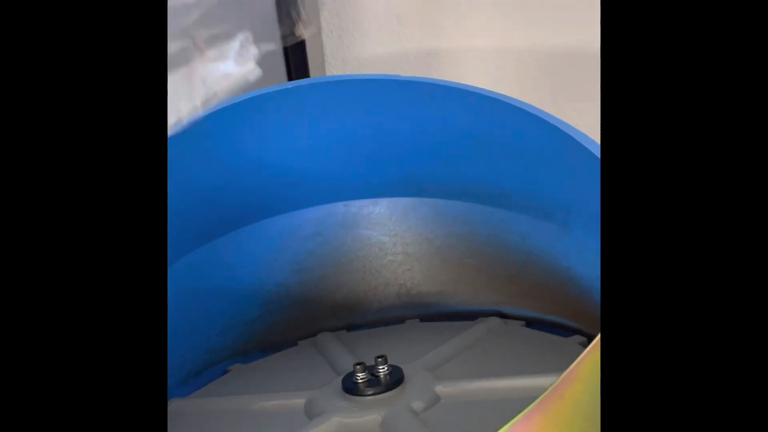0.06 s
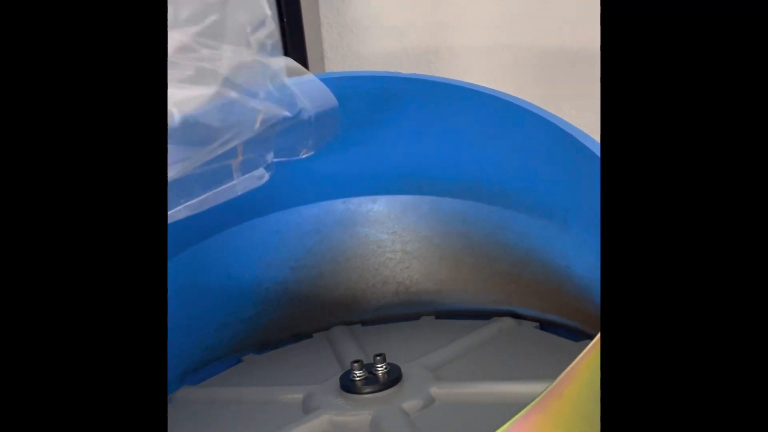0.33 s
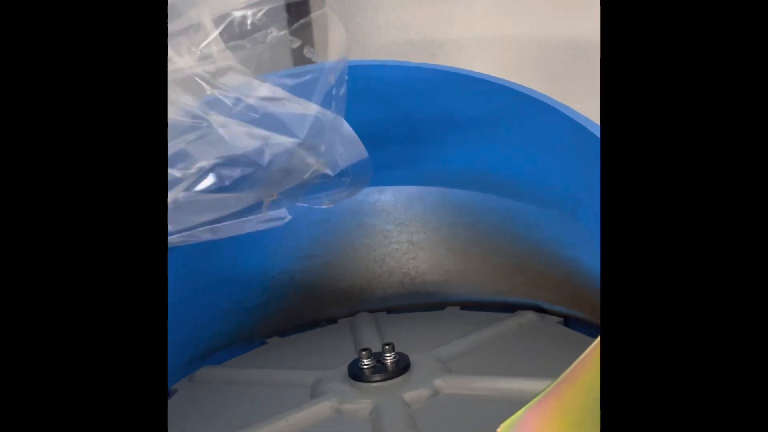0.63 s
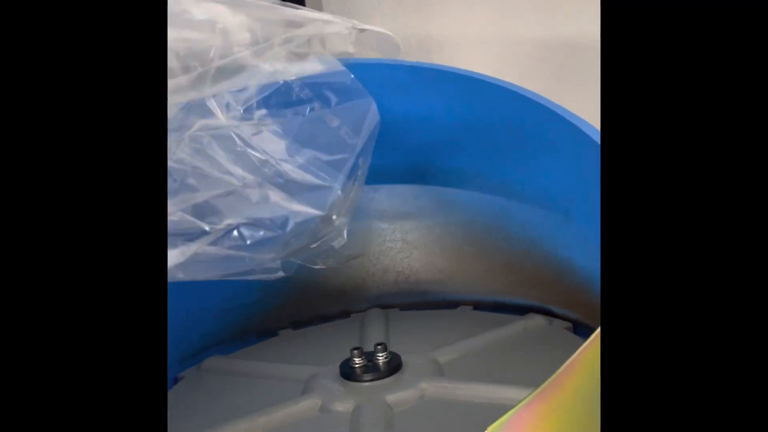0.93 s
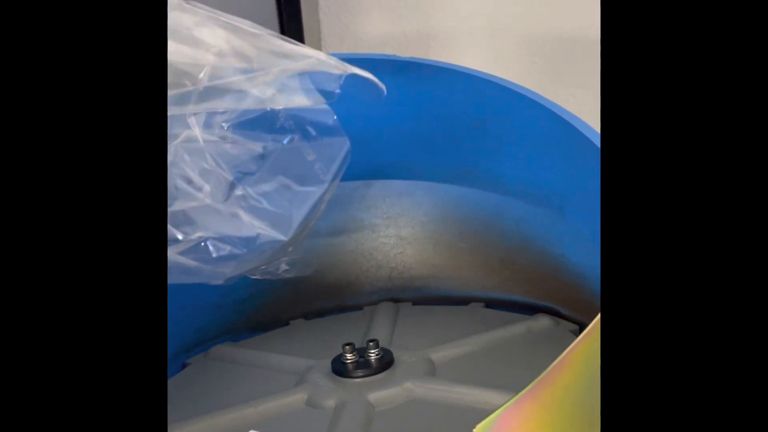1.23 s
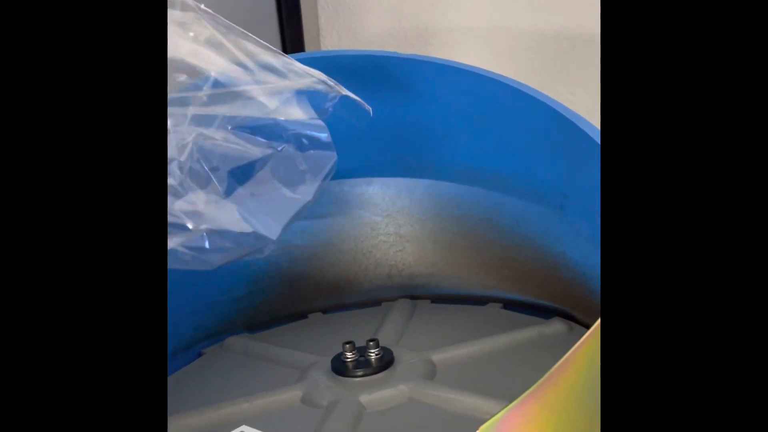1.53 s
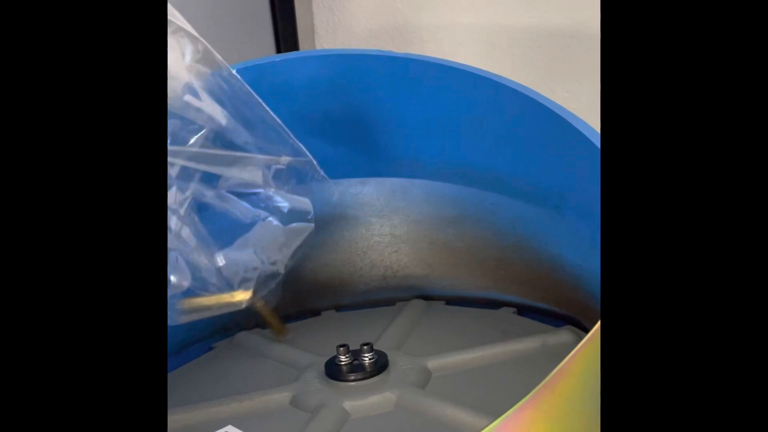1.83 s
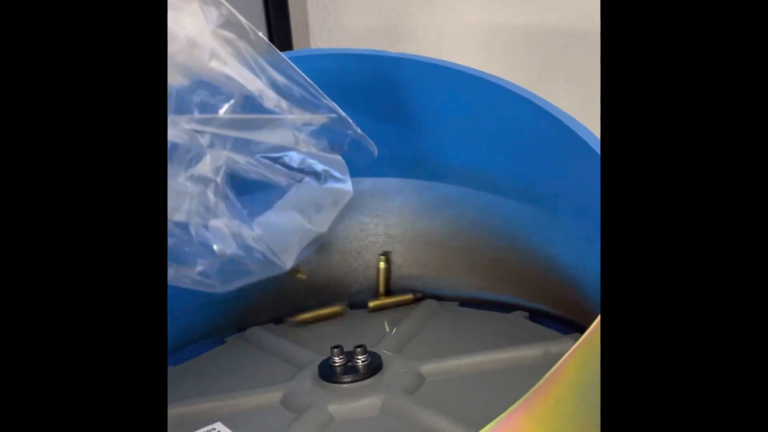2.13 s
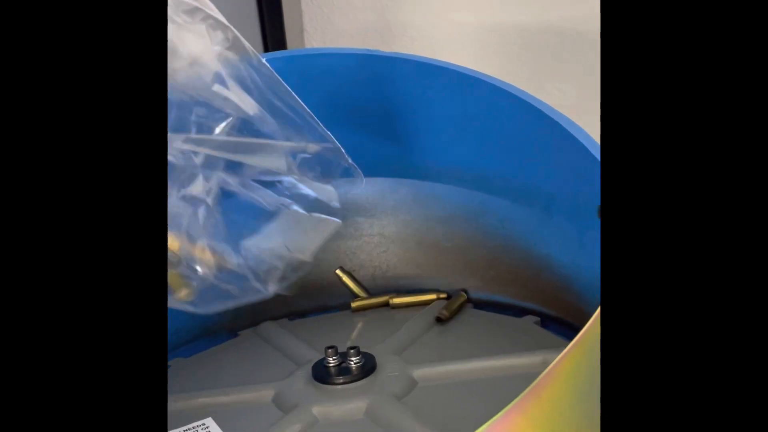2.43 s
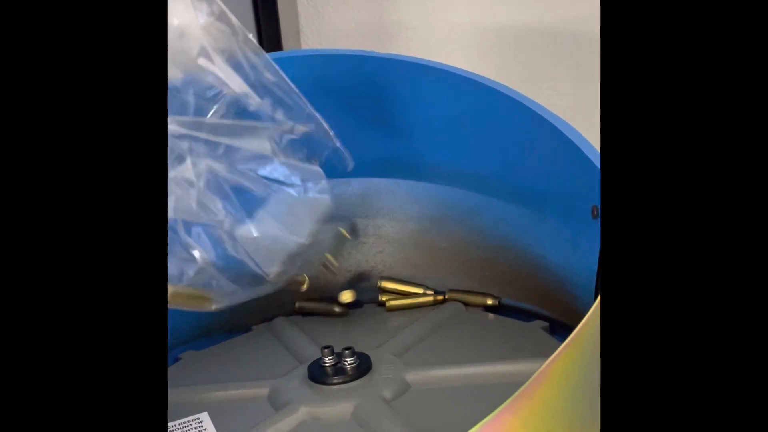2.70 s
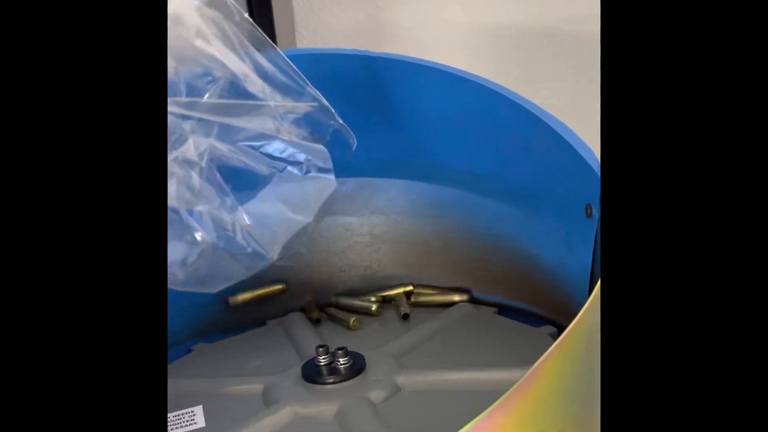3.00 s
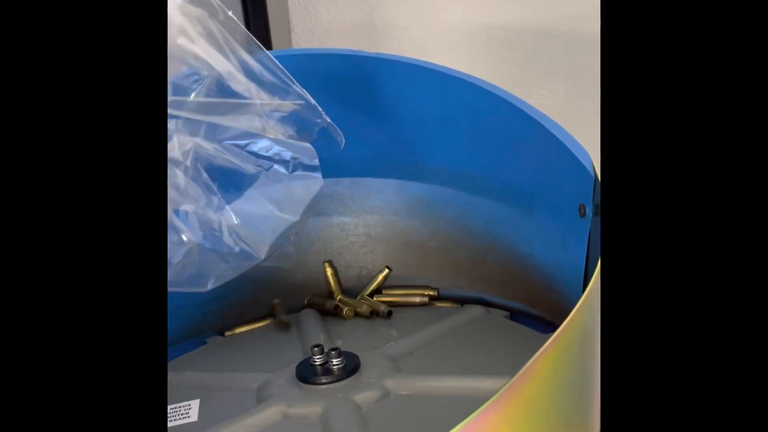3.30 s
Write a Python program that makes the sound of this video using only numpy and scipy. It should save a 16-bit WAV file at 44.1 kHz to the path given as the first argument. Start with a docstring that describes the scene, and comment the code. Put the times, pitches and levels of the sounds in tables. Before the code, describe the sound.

Brass cartridge cases clatter into a hard bowl, poured from a crinkling plastic bag.

```python
"""A plastic bag of brass cartridge cases is tipped over a hard plastic bowl in a small room.
First the bag crinkles, snaps and pops over a low electrical hum, and the cases jingle inside.
At about 1.7 s they slide to the bag's mouth. From 1.8 s the hum is quieter and the cases drop,
bounce and roll: the bowl clacks and thumps, and brass rings very high where case meets case.
The last small hits die away at about 3.5 s."""
import sys
import numpy as np
from scipy import signal
from scipy.fft import rfft, irfft, next_fast_len
from scipy.io import wavfile

SR = 44100
rng = np.random.default_rng(int(sys.argv[2]) if len(sys.argv) > 2 else 0)


def store_pcm(level_fs):
    """Save levels as 16-bit WAV."""
    pcm = np.round(np.clip(level_fs, -1, 1) * 32767).astype(np.int16)
    wavfile.write(sys.argv[1], SR, np.atleast_2d(pcm).T)


N = 156555
TIME = np.arange(N) / SR
# A "fade" is the time a sound takes to fall by 60 dB. A "tone" table boosts or cuts each pitch.
TICK_FADE_S, TICK_BAND_HZ = 0.0036, (5000, 16000)  # the sharp edge of a hit or a snap


def bowl_hits(chatter_db=-1.5, tick_db=5):
    """Each landing case ticks, chatters against the bowl and sets it ringing."""
    # cases striking the bowl: start_s, low_db, middle_db, high_db
    hits = [(1.7973, -44, -20, -22), (1.814, -13, -6.5, -17), (1.817, -39, -13, -36), (1.84, -22, -17, -48),
            (1.8495, -20, -14, -5.5), (1.858, -22, -14.5, -26), (1.906, -40, -20, -24),
            (1.9152, -21, -9, -8), (1.921, -23, -29, -16), (1.931, -18, -12, -14),
            (2.0502, -24, -14.5, -12.5), (2.0972, -16.5, -13.5, -21), (2.109, -23, -13, -7),
            (2.1499, -19.5, -19, -28), (2.158, -17.5, -19, -37), (2.163, -32, -18, -18.5),
            (2.1925, -27.5, -24, -21.5), (2.2134, -29, -19, -28), (2.285, -27, -19, -27.5),
            (2.312, -27, -17.5, -14), (2.351, -23.5, -22, -26), (2.4643, -26.5, -27.5, -30),
            (2.5299, -27, -13, -18), (2.564, -16, -6, -8.5), (2.5956, -19, -38, -9),
            (2.604, -21.5, -26, -11), (2.608, -20.5, -12, -21), (2.6753, -44, -19.5, -21),
            (2.6948, -11, -15.5, -14.5), (2.7212, -25, -14.5, -8), (2.7664, -31, -23, -16),
            (2.8294, -22, -14, -12.5), (2.8844, -29, -29, -22), (2.899, -27, -23, -18.5),
            (2.916, -34, -22.5, -21.5), (3.042, -34, -32, -29), (3.165, -22, -15.5, -14),
            (3.1935, -17, -15, -17), (3.203, -29, -32, -44), (3.2745, -30, -21.5, -24),
            (3.384, -41.5, -32.5, -46), (3.4268, -49, -45, -55), (3.437, -43, -39, -55)]
    # the low, middle and high bands of a hit: from_hz, to_hz
    bands = [(1050, 1785), (2200, 4460), (4500, 9300)]
    # tone of a hit: pitch_hz, level_db
    tone = [(150, 13), (700, 1.5), (950, -1), (1250, 2), (2500, 6), (3500, -1.5), (5000, 2), (7000, 3),
            (9500, -1), (11500, -2), (16000, -5.5)]
    out = np.zeros(N)
    for start_s, *band_dbs in hits:
        chatter = sum(from_db(db + chatter_db) * burst(fade_s=0.03, band_hz=band, hold_s=0.0009)
                      for db, band in zip(band_dbs, bands))
        add(out, start_s, chatter)
        add(out, start_s, from_db(band_dbs[-1] + tick_db) * burst(TICK_FADE_S, TICK_BAND_HZ))
        add(out, start_s, through(chatter, bowl_ring()))
    return colour(out, tone)


def bowl_ring(fade_s=0.04, gain_db=-2, pitch_spread=0.012, spread_db=4):
    """The bowl's own notes; each spot that is struck changes their pitch and strength a little."""
    # notes of the bowl: pitch_hz, level_db
    notes = [(1323, -7), (1572, -7), (1909, -9), (2040, -9), (2342, -11), (2514, -8), (2951, -7),
             (4221, -10), (4336, -8), (5073, -9), (5680, -10), (6900, -12)]
    hz, db = np.transpose(notes)
    detune, uneven = rng.standard_normal((2, len(hz)))
    ring = ringing(hz * (1 + pitch_spread * detune), db + gain_db + spread_db * uneven, fade_s)
    return 2 * ring / fade(fade_s).sum()


def rolling():
    """Cases roll and jostle, and the bowl rings along."""
    # loudness of the rolling: time_s, level_db
    loudness = [(1.8, -66), (1.88, -26.5), (2.0, -40), (2.16, -24), (2.26, -47.5), (2.34, -32), (2.5, -42),
                (2.62, -31), (2.78, -29), (2.9, -33), (3.05, -35.5), (3.15, -41), (3.22, -34.5),
                (3.36, -47.5), (3.47, -53.5), (3.55, -59)]
    # tone of the rolling: pitch_hz, level_db
    tone = [(200, -14), (600, -12), (1200, 2.5), (2000, 6), (3000, 6.5), (4500, 0.5), (7000, 1.5),
            (10000, -21), (16000, -29)]
    contacts = crackle(loudness, tone, per_s=600, spread_db=5)
    return contacts + through(contacts, bowl_ring())


def bowl_thumps(echo_fade_s=0.06, echo_db=-1, low_cut_hz=50):
    """The bowl's wall flexes. High waves arrive first, so the pitch falls; rim echoes roughen it."""
    # flexes of the wall: start_s, level_db, start_pitch_hz, time_to_half_pitch_s, fade_s
    thumps = [(1.816, -19, 590, 0.0022, 0.08), (2.833, -26, 480, 0.016, 0.1),
              (2.906, -22.5, 600, 0.0022, 0.095), (3.168, -37, 715, 0.002, 0.12)]
    out, echo_fade = np.zeros(N), fade(echo_fade_s)
    for start_s, db, start_hz, halving_s, fade_s in thumps:
        decay = fade(fade_s)
        hz = start_hz / (1 + TIME[:len(decay)] / halving_s)
        wave = from_db(db) * decay * np.sin(2 * np.pi * np.cumsum(hz) / SR)
        echoes = rng.standard_normal(len(echo_fade)) * echo_fade / np.linalg.norm(echo_fade)
        add(out, start_s, wave)
        add(out, start_s, from_db(echo_db) * through(wave, echoes))
    return signal.sosfilt(signal.butter(2, low_cut_hz, "high", fs=SR, output="sos"), out)


def brass_tings(other_notes_db=-4):
    """Case meets case: one clear, high note sounds over the case's other notes."""
    # cases touching: start_s, level_db, pitch_hz
    tings = [(0.375, -32, 13330), (0.468, -30, 11480), (1.855, -30, 13280), (2.045, -32, 13200),
             (2.095, -31, 13150), (2.42, -38, 13500), (2.582, -23, 15350), (2.72, -29, 13400),
             (2.902, -27, 15700), (3.165, -26, 13280), (3.27, -27, 15630), (3.311, -28, 15630)]
    out = np.zeros(N)
    for start_s, db, hz in tings:
        add(out, start_s, ringing(hz, db, fade_s=0.28, size=8000))
        add(out, start_s, from_db(db + other_notes_db) * case_ring())
    return out


def brass_jingle(per_s=130, spread_db=5):
    """A dozen cases take turns ringing in quick, light touches."""
    # loudness of the jingle: time_s, level_db
    loudness = [(0.05, -81), (.31, -54), (.38, -37), (.49, -27), (.6, -54), (.8, -76), (.9, -58),
                (1.03, -47), (1.12, -88), (1.52, -53), (1.63, -42), (1.8, -40), (1.95, -56), (2.26, -63),
                (2.45, -39), (2.7, -29.5), (2.95, -38), (3.14, -45), (3.33, -55), (3.55, -50)]
    out = np.zeros(N)
    cases = [case_ring() for _ in range(12)]
    for k, slot_s in enumerate(np.arange(0, N / SR, 1 / per_s)):
        start_s = slot_s + rng.random() / per_s
        add(out, start_s, from_db(spread_db * rng.standard_normal()) * cases[k % len(cases)])
    return level(loudness) * unit_power(out)


def case_ring(pitch_spread=0.004, spread_db=4):
    """One brass case rings, with its own tuning and its own strength in each note."""
    # notes of a case: pitch_hz, level_db, fade_s
    notes = [(11050, -14, .16), (11650, -17, .12), (12380, -15, .16), (13280, -12, .14), (13550, -14, .12),
             (15350, -1, .11), (15650, -1, .11)]
    hz, db, fade_s = np.transpose(notes)
    tuning = 1 + pitch_spread * rng.standard_normal()
    return ringing(hz * tuning, db + spread_db * rng.standard_normal(len(hz)), fade_s, size=8000)


def bag_snaps(tick_db=6, body_db=-7):
    """Folds in the bag snap: a bright tick on top of a fuller burst of noise."""
    # snapping folds: start_s, level_db
    snaps = [(0.1, -28.5), (0.171, -24), (0.2, -17), (0.25, -15.5), (0.282, -23.5), (0.297, -20),
             (0.374, -14.5), (0.45, -11), (0.519, -18.5), (0.614, -15), (0.671, -14.5), (0.76, -22.5),
             (0.81, -20), (0.828, -24), (0.866, -16), (0.892, -14), (0.936, -17), (0.991, -20),
             (1.104, -14), (1.118, -20), (1.193, -18.5), (1.273, -17), (1.296, -15), (1.344, -26),
             (1.352, -21), (1.418, -18.5), (1.471, -27), (1.493, -15), (1.593, -13.5), (1.695, -8),
             (1.753, -16)]
    # tone of a snap's body: pitch_hz, level_db
    tone = [(100, -7), (450, 5.5), (900, 8.5), (1600, 6), (2600, 2), (6000, 0), (10000, 2), (16000, -40)]
    bodies, ticks = np.zeros((2, N))
    for start_s, db in snaps:
        add(ticks, start_s, from_db(db + tick_db) * burst(TICK_FADE_S, TICK_BAND_HZ))
        add(bodies, start_s, from_db(db + body_db) * burst(fade_s=0.03, band_hz=(150, 16000)))
    return colour(bodies, tone) + ticks


def bag_slide():
    """Cases scrape down the plastic to the mouth, with the hollow tone of the bag."""
    # loudness of the slide: time_s, level_db
    loudness = [(1.55, -45), (1.68, -36.5), (1.73, -33), (1.762, -11), (1.785, -51), (1.805, -12.5),
                (1.84, -37), (1.89, -61)]
    # tone of the slide: pitch_hz, level_db
    tone = [(100, -28), (600, -11), (830, 11.5), (1100, -7), (1800, -12), (2700, 2), (4000, -13),
            (7000, 1.5), (9500, 2.5), (11000, -38), (16000, -41)]
    sliding = (TIME > loudness[0][0]) & (TIME < loudness[-1][0])
    return sliding * crackle(loudness, tone, per_s=430, spread_db=15)


def bag_crinkle():
    """Many tiny creases crack as the bag moves."""
    # loudness of the crinkling: time_s, level_db
    loudness = [(0, -42.5), (.15, -53), (.26, -40.5), (.34, -38.5), (.39, -33.5), (.5, -28), (.58, -40.5),
                (.64, -42), (.73, -42.5), (.85, -49.5), (.89, -38), (1.05, -45.5), (1.22, -44), (1.3, -36),
                (1.52, -38.5), (1.6, -33.5), (1.68, -34), (1.76, -26.5), (1.82, -32), (1.9, -40),
                (2.0, -38.5), (2.25, -47.5), (3.55, -69)]
    # tone of the crinkling: pitch_hz, level_db
    tone = [(100, -20.5), (300, 8.5), (700, 0), (1700, 4.5), (2400, 0.5), (4000, 0.5), (7500, -4.5),
            (9200, -8), (11000, -12), (16500, -27)]
    return crackle(loudness, tone, per_s=380, spread_db=4)


def bag_pops():
    """The bag buckles, and a pocket of air and plastic rings with a hollow pop."""
    # buckles of the bag: start_s, level_db
    pops = [(0.297, -26.5), (0.373, -28.5), (0.6745, -17.5), (1.695, -32)]
    # notes of the pocket: pitch_hz, level_db, fade_s
    notes = [(500, -0.5, 0.033), (674, -5.5, 0.034), (1330, 4.5, 0.011)]
    out = np.zeros(N)
    for start_s, db in pops:
        add(out, start_s, from_db(db) * ringing(*np.transpose(notes)))
    return out


def bag_rumble():
    """The cases shift inside the bag with a dull rumble."""
    # loudness of the rumble: time_s, level_db
    loudness = [(0, -39), (.45, -39), (.8, -38), (1.5, -39.5), (1.65, -34), (1.72, -30), (1.81, -28.5),
                (1.88, -47.5), (2.0, -46), (2.26, -53.5), (2.55, -40), (2.9, -48.5), (3.25, -47),
                (3.4, -57), (3.55, -57)]
    # tone of the rumble: pitch_hz, level_db
    tone = [(25, -32), (50, -8), (75, 1), (110, 2), (150, -5), (290, 1), (346, 3), (430, -2), (620, -6),
            (810, -4), (1100, -11), (2500, -22), (8000, -45)]
    return crackle(loudness, tone, per_s=500, spread_db=4.5)


def room_echoes(sound, fade_s=0.11, rise_s=0.00067, gain_db=-10.5):
    """Sound bounces around the bowl and the room, partly differently on the left and right."""
    # how much the two sides differ: pitch_hz, level_db
    side_tone = [(100, -25.5), (400, -0.5), (1400, -6.5), (3500, 9.5), (6000, -2.5), (10000, -13),
                 (15500, -13)]
    decay = fade(fade_s)
    decay *= 1 - np.exp(-TIME[:len(decay)] / rise_s)
    decay /= np.linalg.norm(decay)
    middle, side = (through(sound, noise[:len(decay)] * decay) for noise in rng.standard_normal((2, N)))
    return from_db(gain_db) * (middle + colour(side, side_tone) * np.array([[1], [-1]]))


def hum():
    """An electrical hum of two low notes that waver slightly."""
    # notes of the hum: pitch_hz, level_db
    notes = [(48.7, 2), (98.6, -3.5)]
    # loudness of the hum: time_s, level_db
    loudness = [(0, -36.5), (1.8, -35.5), (1.9, -52), (2.3, -54), (3.2, -52), (3.55, -72)]
    out = np.zeros(N)
    for k, (hz, db) in enumerate(notes):
        gain = from_db(db + .5 * (k + 5.5) * waver())
        out += gain * np.sin(2 * np.pi * hz * TIME + 0.058 * (k + 1) * waver())
    return np.sqrt(2) * level(loudness) * out


def waver(below_hz=4):
    """A slow, random drift up and down."""
    smoothing = signal.butter(2, below_hz, fs=SR, output="sos")
    return unit_power(signal.sosfilt(smoothing, rng.standard_normal(N + SR))[SR:])


def burst(fade_s, band_hz, hold_s=0, rise_s=0.00068, size=4096):
    """A flurry of tiny contacts: a band of noise that rises, holds and fades."""
    band = signal.butter(2, band_hz, "band", fs=SR, output="sos")
    t = TIME[:size]
    shape = from_db(-60 * np.maximum(t - hold_s, 0) / fade_s) * (1 - np.exp(-t / rise_s))
    noise = signal.sosfilt(band, rng.standard_normal(size) * shape)
    return unit_power(noise) * np.sqrt(np.mean(shape ** 2))


def crackle(loudness, tone, per_s, spread_db, fade_s=0.0057, rustle_db=-4):
    """Tiny random cracks of uneven size over a soft rustle, shaped in tone and loudness."""
    sizes = from_db(spread_db * np.minimum(rng.exponential(1, N), np.pi))
    cracks = sizes * (rng.random(N) < per_s / SR)
    power = np.abs(through(cracks ** 2, fade(fade_s) ** 2))
    noise = rng.standard_normal(N) * np.sqrt(power / power.mean() + from_db(rustle_db) ** 2)
    return level(loudness) * unit_power(colour(noise, tone))


def ringing(hz, db, fade_s, size=4096):
    """Pure notes that start together and fade."""
    t = TIME[:size, None]
    return np.sum(from_db(db - 60 * t / fade_s) * np.sin(2 * np.pi * hz * t), axis=1)


def colour(sound, tone, size=4096):
    """Filter a sound to follow (pitch_hz, level_db) points."""
    gains = from_db(at_hz(tone, np.fft.rfftfreq(size, 1 / SR)))
    cepstrum = irfft(np.log(gains))
    # fold the second half onto the first, so the filter never sounds ahead of its input
    cepstrum[1:size // 2] *= 2
    cepstrum[size // 2 + 1:] = 0
    return through(sound, irfft(np.exp(rfft(cepstrum))))


def through(sound, response):
    """Let every sample of a sound set off a copy of the response (convolution)."""
    return signal.fftconvolve(sound, response)[:N]


def add(out, start_s, sound):
    """Mix a sound in at its start time."""
    i = int(start_s * SR)
    out[i:i + len(sound)] += sound[:max(N - i, 0)]


def fade(fade_s):
    """A gain that falls from 1 down to -60 dB."""
    return from_db(-60 * TIME[:int(fade_s * SR)] / fade_s)


def level(points):
    """Gain over time from (time_s, level_db) points."""
    return from_db(np.interp(TIME, *np.transpose(points)))


def at_hz(points, hz):
    """Read between (pitch_hz, value) points, with every octave equally wide."""
    pitches, values = np.transpose(points)
    return np.interp(np.log(hz + 1e-6), np.log(pitches), values)


def unit_power(sound):
    """Scale to an average power of 1."""
    return sound / np.sqrt(np.mean(sound ** 2) + 1e-20)


def from_db(db):
    """Decibels to gain."""
    return 10 ** (np.asarray(db) / 20)


def scene(left_minus_right_db=-0.5):
    """Bag, bowl and hum in the room, reaching the left and right a little apart in time."""
    # how far the left side is ahead of the right: pitch_hz, phase_rad
    left_lead = [(150, 0), (800, -.2), (2000, .1), (3000, 1.1), (3700, .35), (5000, .6), (6000, 1.35),
                 (10000, 3.1), (14000, 3.3), (15500, 4.3)]
    bag = bag_snaps() + bag_pops() + bag_crinkle() + bag_rumble() + bag_slide()
    cases = bowl_hits() + rolling() + bowl_thumps() + brass_tings() + brass_jingle()
    sides = np.array([[.5], [-.5]])  # left and right each take half of a difference
    sound = bag + cases * from_db(left_minus_right_db * sides) + room_echoes(bag + cases) + hum()
    size = next_fast_len(N + SR)
    phase = at_hz(left_lead, np.fft.rfftfreq(size, 1 / SR))
    return irfft(rfft(sound, size) * np.exp(1j * phase * sides), size)[:, :N]


def record(dry):
    """Round off the loudest peaks and cut the treble above 16200 Hz."""
    rounded = 1.029 * np.tanh(dry / 1.12)
    return signal.sosfilt(signal.ellip(10, .2, 70, 16200, fs=SR, output="sos"), rounded)


dry = scene()
out = record(dry)
store_pcm(out)
```